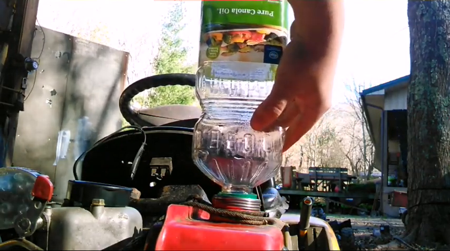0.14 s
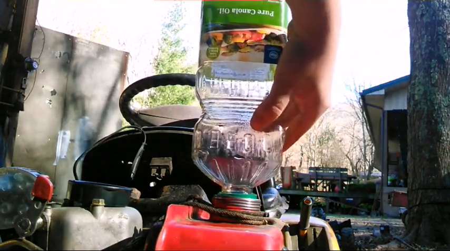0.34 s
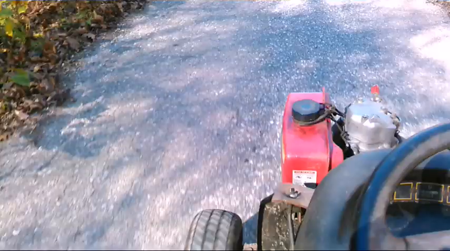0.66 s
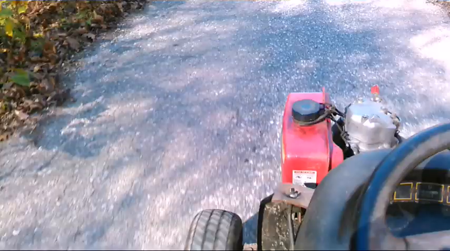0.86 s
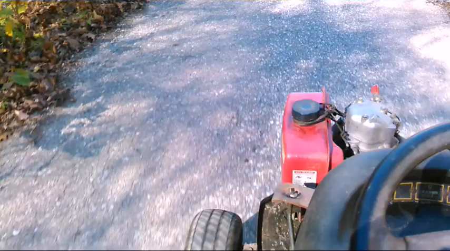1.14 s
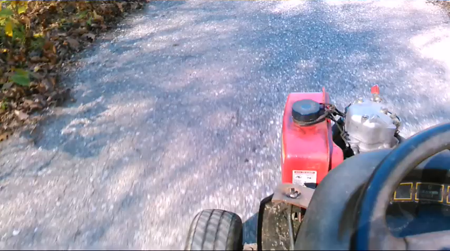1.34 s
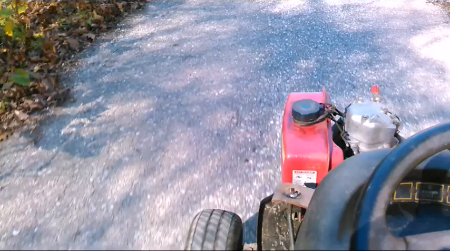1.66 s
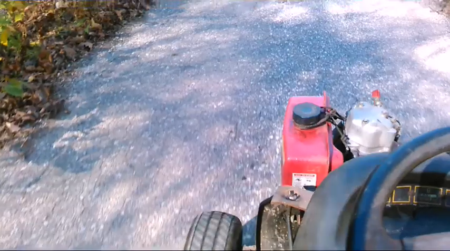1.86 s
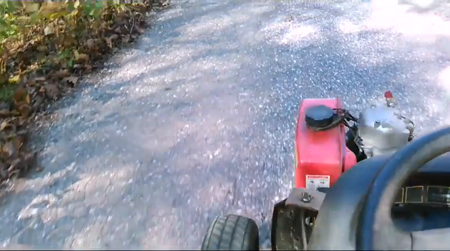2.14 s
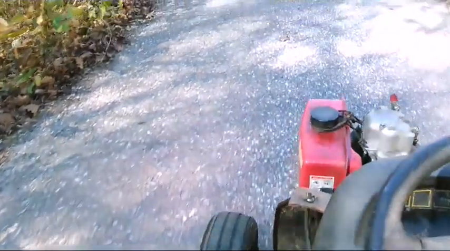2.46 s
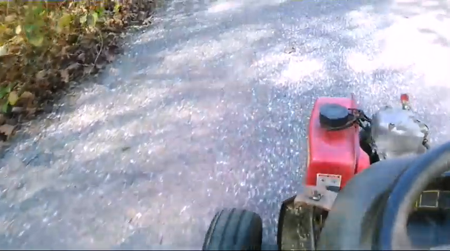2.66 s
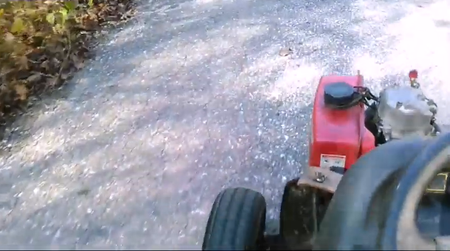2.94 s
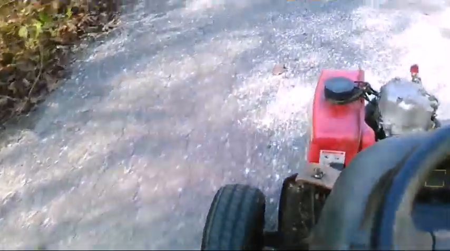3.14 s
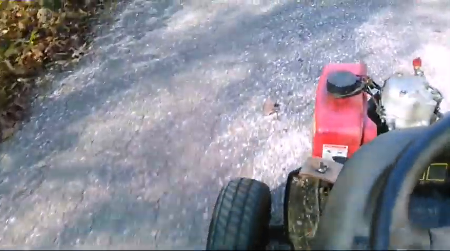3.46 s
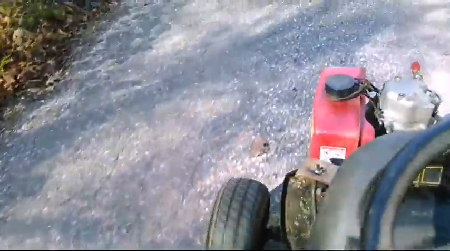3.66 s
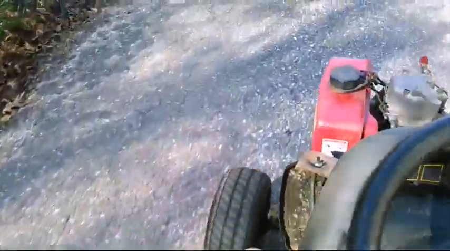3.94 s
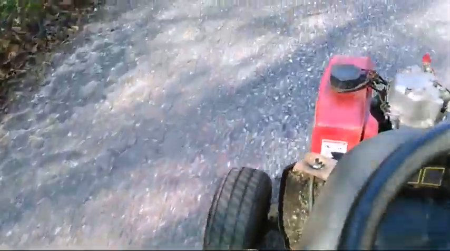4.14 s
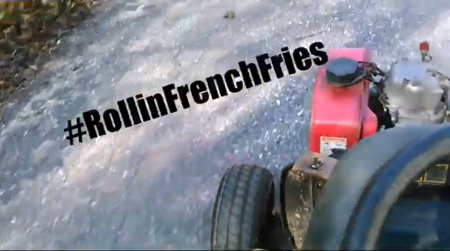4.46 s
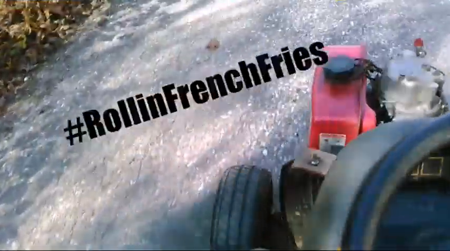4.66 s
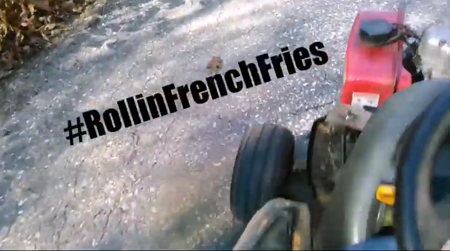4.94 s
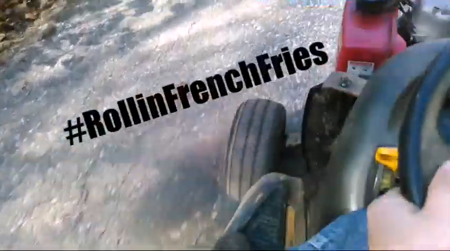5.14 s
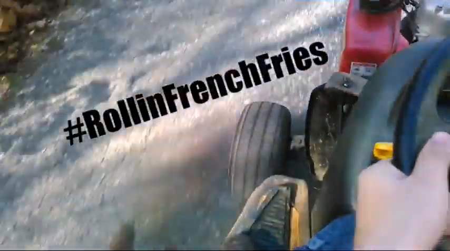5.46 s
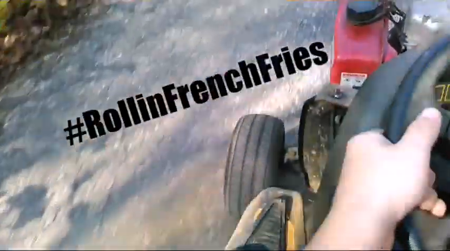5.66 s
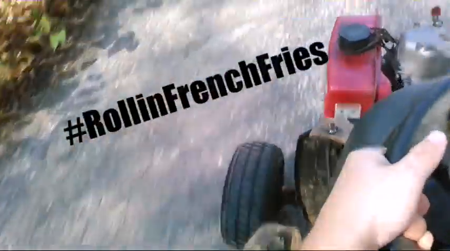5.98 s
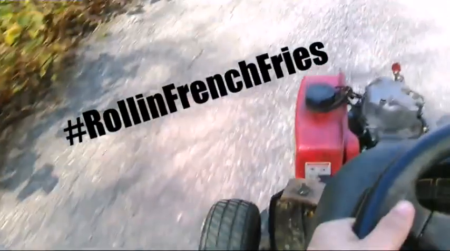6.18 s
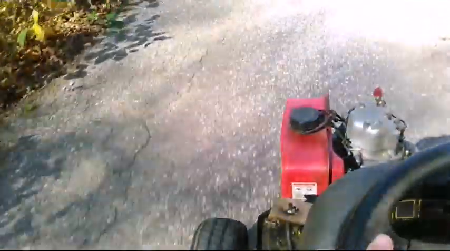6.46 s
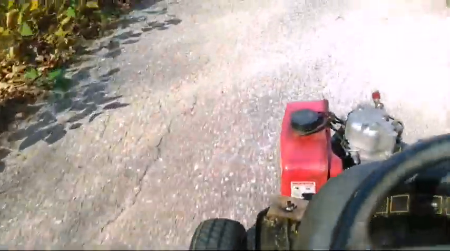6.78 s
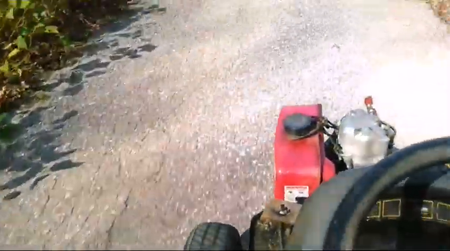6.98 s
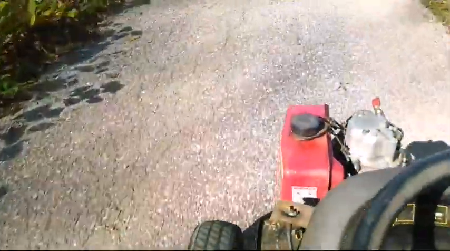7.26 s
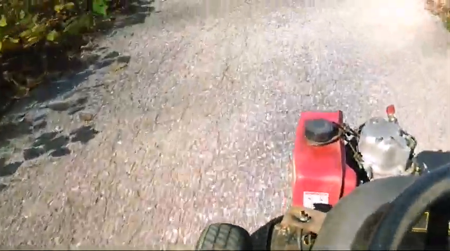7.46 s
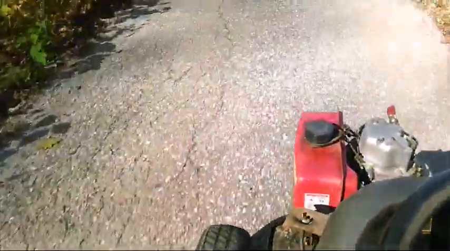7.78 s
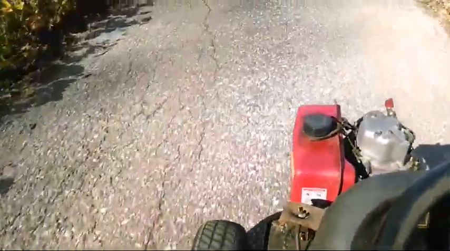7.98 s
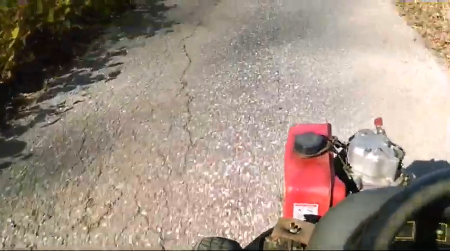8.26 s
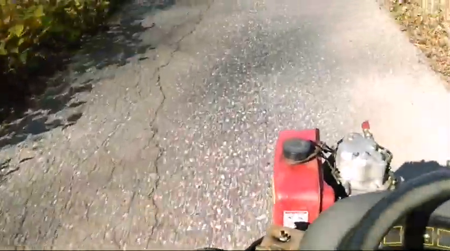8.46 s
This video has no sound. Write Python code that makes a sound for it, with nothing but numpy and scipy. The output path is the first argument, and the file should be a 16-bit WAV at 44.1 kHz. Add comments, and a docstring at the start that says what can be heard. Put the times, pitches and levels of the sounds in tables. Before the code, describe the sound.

A small one-cylinder diesel on a garden tractor is heard up close outdoors, entering abruptly after a short soft thump, a faint rustle of a plastic bottle and a brief silence. It idles with thudding exhaust and chattering loose metal covers, eases slightly, then revs up with hard knocking. The engine levels off at high speed and keeps running evenly with a bright metallic clatter.

```python
"""First a short low thump, a faint low hum and the rustle of a plastic bottle in a quiet yard; then a
moment of silence; then a ride on a garden tractor. Its one-cylinder diesel idles, knocks hard as it is
throttled up, and settles at the speed its governor (a speed regulator) holds.
Puffs of gas make the drone, burning fuel shakes the engine block, and loose tin clatters in every
cycle (the time from one firing to the next). A limiter holds down the loudest peaks."""
import sys
import numpy as np
from scipy import signal
from scipy.fft import rfft, irfft
from scipy.io import wavfile
from scipy.ndimage import uniform_filter1d, minimum_filter1d

SR = 44100
rng = np.random.default_rng(int(sys.argv[2]) if len(sys.argv) > 2 else 0)


def wrap_up_sound(samples):
    """Save the sound to the file named by the first command line argument, as 16-bit audio."""
    columns = np.atleast_2d(samples).T
    # keep every value between -1 and 1, then stretch to whole-number steps
    tamed = np.clip(columns, -1, 1)
    steps = np.round(tamed * 32767).astype(np.int16)
    wavfile.write(sys.argv[1], SR, steps)


N = 380141
TIME = np.arange(N) / SR

# A short low thump, then faint crinkles: (time [s], level [dB], pitch [Hz], width [Hz], decay [s])
THUMP_AND_CRINKLES = [(.003, -31, 135, 40, 0.0096), (.487, -71, 900, 1200, .05),
                      (.636, -59.5, 1500, 2500, 0.11), (.64, -61, 5200, 1200, 0.047)]
# Tone colours of the yard's hum and air: (frequency [Hz], level [dB])
HUM_COLOUR = [(25, -20), (45, -16), (60, 3), (75, -2), (100, -17), (200, -20), (400, -52)]
AIR_COLOUR = [(100, -39), (170, -14), (254, 3), (454, -4), (799, -5), (2200, -22), (3350, -32), (3870, -38),
              (4780, -29), (8000, -51), (10400, -79), (17600, -120)]
# Swells of the hum: (start [s], length [s], level [dB])
YARD_SWELLS = [(.014, 0.054, -49.5), (0.3, 0.14, -57), (.68, 0.078, -55)]
# Soft rustles: (time [s], level [dB], decay [s])
SOFT_RUSTLES = [(.098, -64, 0.074), (.305, -68, .08), (.487, -53.5, 0.5)]

# Tones of the drone at idle, lugging (straining at low speed), revving up and at full speed:
# (pitch [multiple of the firing rate], level [dB])
IDLE_TONES = [(1, -49), (2, -38), (3, -29), (4, -24), (5, -27), (6, -21), (7, -23), (8, -32), (9, -25),
              (10, -22), (11, -20), (12, -22), (13, -29), (14, -28), (15, -25), (16, -32), (17, -31),
              (18, -25), (19, -32), (20, -40), (21, -35), (22, -34), (24, -44), (26, -31), (28, -38),
              (30, -31), (32, -36), (34, -42), (36, -41), (38, -48), (40, -47)]
LUG_TONES = [(1, -46), (2, -33), (3, -31), (4, -25), (5, -24), (6, -21), (7, -21), (8, -28), (9, -35),
             (10, -33), (11, -28), (12, -27), (13, -30), (14, -23), (15, -36), (16, -26), (17, -29),
             (18, -24), (19, -30), (20, -30), (21, -37), (22, -35), (24, -35), (26, -43), (28, -44),
             (30, -37), (32, -46), (34, -43), (36, -38), (38, -34), (40, -34)]
REV_TONES = [(1, -39), (2, -25), (3, -22), (4, -29), (5, -26), (6, -21), (7, -19), (8, -21), (9, -27),
             (10, -22), (11, -27), (12, -19), (13, -21), (14, -19), (15, -24), (16, -25), (17, -28),
             (18, -27), (19, -26), (20, -32), (21, -31), (22, -34), (24, -38), (26, -37), (28, -37),
             (30, -32), (32, -33), (34, -34), (36, -37), (38, -35), (40, -34)]
FAST_TONES = [(1, -34), (2, -19), (3, -20), (4, -32), (5, -26), (6, -21), (7, -17), (8, -24), (9, -22),
              (10, -19), (11, -28), (12, -24), (13, -23), (14, -20), (15, -22), (16, -25), (17, -31),
              (18, -30), (19, -33), (20, -40), (21, -42), (22, -41), (24, -36), (26, -45), (28, -36),
              (30, -42), (32, -41), (34, -40), (36, -45), (38, -44), (40, -43)]
# Exhaust, intake and compression puffs in the same four states:
# (place in cycle [0-1], pipe pitch [Hz], sharpness of the ring [Q], weight [dB])
IDLE_GAS_PUFFS = [(.04, 420, 6, -21), (.32, 150, 2.2, 0.5), (.56, 215, 2.2, -4), (.84, 235, 2.5, -14.5)]
LUG_GAS_PUFFS = [(.32, 240, 2.2, -1), (.55, 200, 2.2, 0), (.83, 220, 2, -9)]
REV_GAS_PUFFS = [(0.324, 326, 5.7, -4), (0.535, 221, 2.8, 2), (.8, 200, 1.8, -3)]
FAST_GAS_PUFFS = [(0.316, 437, 5.5, 0), (0.512, 219.4, 3.3, 4), (.77, 165, 1.4, 0.5)]
# Tone colour of gas swirling in the pipes: (frequency [Hz], level [dB])
SWIRL_COLOUR = [(25, -22), (60, -5), (120, -1), (250, -1.5), (430, 0), (600, -16), (1200, -13)]
# Rushes of gas through the valves: (place in cycle [0-1], rise [cycles], fall [cycles], level [dB])
IDLE_RUSHES = [(.26, .04, .08, 0), (.575, .02, .04, -2)]
FAST_RUSHES = [(.34, .05, .06, 0), (.5, .03, .1, -1)]
# Notes those rushes ring in the pipes: (pitch [Hz], width [Hz], level [dB])
PIPE_NOTES = [(416, 100, 0), (610, 200, -4.5), (746, 93, 3), (813, 100, -5)]

# Hits on the block, the tin covers and a loose panel, and those of the hard knock:
# (place in cycle [0-1], rise [cycles], fall [cycles], level [dB])
BLOCK_HITS = [(.11, .09, .22, 0), (.27, .05, .08, -4), (.58, .03, .06, -4), (.92, .04, .15, -8)]
IDLE_TIN_HITS = [(.06, .012, .02, -2), (.39, .06, .1, -14), (.585, .012, .025, -8), (.73, .04, .09, -3),
                 (.895, .008, .025, -7)]
FAST_TIN_HITS = [(.04, .015, .05, -4), (.16, .06, .08, -5), (.35, .015, .07, 1), (.5, .03, .08, -2),
                 (.72, .04, .07, 0)]
PANEL_HITS = [(.07, .06, .14, -3), (.2, .06, .2, -5)]
KNOCK_HITS = [(.11, .06, .05, 0), (.2, .02, .06, -5)]
# Tone colours of the block, the tin and the fine sizzle: (frequency [Hz], level [dB])
BLOCK_COLOUR = [(150, 5), (300, 1), (430, 5.5), (580, -2.5), (740, -0.5), (900, -2), (1120, -0.5),
                (1450, -11), (2000, -12), (2450, -17.5), (3000, -12.5), (6000, -11.5), (8000, -64)]
IDLE_TIN_COLOUR = [(1500, -10.5), (2900, -16), (3600, -6.5), (4300, -2), (4700, 2), (5200, 6), (5700, 0.5),
                   (6400, -2.5), (7000, -8.5), (7500, -33), (7900, -116)]
FAST_TIN_COLOUR = [(1500, -19.5), (2900, -22), (3700, -18.5), (4350, -8.5), (4900, -6), (5500, -3),
                   (5850, -2), (6400, -6.5), (7000, -16.5), (7600, -21.5), (8400, -99.5)]
SIZZLE_COLOUR = [(6000, -45), (8200, -10.5), (9800, 1), (11000, -5.5), (11900, 2.5), (12700, -6.5),
                 (13300, -11), (14500, -12), (15600, -42)]
# Notes of the clinking covers: (pitch [Hz], width [Hz], idle level [dB], full-speed level [dB])
COVER_NOTES = [(2437, 48, -8, -12), (3514, 39, -12, -13), (4177, 84, -5.5, -12), (4380, 52, -10, -3.5),
               (5380, 56, -12, 1), (5453, 86, 1, 4.5), (5580, 34, 2.5, -1.5), (5910, 46, -2.5, 3),
               (6420, 54, -6, -11)]
# Pings of valve gear and covers: (place in cycle [0-1], rise [cycles], fall [cycles], pitch [Hz],
# idle level [dB], revving level [dB], full-speed level [dB])
METAL_PINGS = [(.025, .015, .05, 6050, -21, -20, -11), (.365, .012, .055, 5700, -32, -6, -12),
               (.575, .01, .025, 6450, -9, -24, -22), (.71, .03, .07, 5520, -11, -6, -3),
               (.765, .025, .045, 5680, -10, -8, -3.5), (.73, .025, .07, 4200, -14, -16, -15),
               (.74, .03, .08, 2430, -23, -25, -25), (.885, .008, .028, 5800, -8.5, -19, -22)]
# Brief, faint, bright crackles of overload distortion at idle: (time [s], level added to CRACKLE_DB [dB])
OVERLOAD_CRACKLES = [(1.1623, -36), (1.2436, -32), (1.6297, -31), (1.8876, -34), (1.9604, -40),
                     (2.1435, -32), (2.2722, -32), (2.4653, -35), (2.9158, -31)]
# Notes of the block under hard knock: (pitch [Hz], width [Hz], level [dB])
KNOCK_NOTES = [(715, 80, 2), (900, 90, 1), (1040, 70, 10), (1150, 80, 9), (1240, 80, 1), (1480, 90, -1),
               (1610, 70, -2), (1720, 60, -2), (1860, 70, -5)]
# Brief dips in the tin's chatter: (middle [s], half length [s], depth [dB])
CHATTER_DIPS = [(4.15, 0.44, -3), (4.75, 0.16, -2), (8.174, 0.36, -3)]

YARD_OFF_S, ENGINE_ON_S = .758, 1.144
HUM_FLOOR_DB, HUM_EDGE_S, AIR_DB = -60, .025, -64.5
IDLE_RATE, LUG_RATE, REV_RATE, GOVERNED_RATE = 15.557, 18.2, 22.9, 27.8213  # firings per second
# The fuel is eased off, the throttle opens, then the governor catches the speed.
EASE_S, OPEN_S, CATCH_S = 2.72, 3.2403, 4.57
EASE_TAKES_S, OPEN_TAKES_S, CATCH_TAKES_S = .31, .029, .13
CLIMB_PER_S, DRAG_S, SETTLE_S = 12.4554, 2.3136, .1499  # the climb starts at this gain in rate per s
IDLE_FUEL, CRUISE_FUEL = .7, .66  # fuel per stroke: 0 is least, 1 is full
OPENING_SHARE = .36  # share of the effort that comes at once with the throttle; the rest needs speed
# Loudness rules: (idle level [dB], gain from least to full fuel [dB], gain from idle to full speed [dB])
DRONE_LAW, SWIRL_LAW = (1.2, .5, .8), (-31, 0, 12.5)
BLOCK_LAW, TIN_LAW, KNOCK_LAW = (-17.3, 7, .5), (-14.5, 6.6, 2.1), (-29, 52, -4)
RASP_IDLE_DB, RASP_FAST_DB = -24.5, -20
PANEL_IDLE_DB, PANEL_QUIET_DB, PANEL_FAST_DB = 1.5, -35, -24.5  # relative to the tin's hits
SIZZLE_IDLE_DB, SIZZLE_OPEN_DB, SIZZLE_WAKES_S = -56.5, -29.5, .18
SIZZLE_FLICKER_DB, SIZZLE_DIP_RATIO = 2.86, 2.85  # at full speed it dips this many times as many dB
CRACKLE_DB, CRACKLE_DECAY_S = -7, .005
IGNITION_PLACE, IGNITION_DB = .105, 2  # place in the cycle; level relative to the knock's rattle
CEILING_DB, CUTOFF_HZ = -.5, 16200


def from_db(db):
    """Turn decibels into a factor to multiply by."""
    return 10 ** (np.asarray(db) / 20)


def rms_one(x):
    """Scale a signal to an average (rms) level of 1."""
    return x / np.sqrt(np.mean(x ** 2) + 1e-20)


def ramp(start_s, takes_s):
    """Rise from 0 to 1 in a straight line."""
    return np.clip((TIME - start_s) / takes_s, 0, 1)


def dying(start_s, decay_s):
    """Start suddenly, then fade away."""
    return (TIME > start_s) * np.exp(-np.clip((TIME - start_s) / decay_s, 0, 20))


def drift(per_s):
    """Wander at random, by about 1 either way, through per_s points a second."""
    points = rng.standard_normal(N // 8)
    return np.interp(TIME * per_s, np.arange(len(points)), points)


def coloured(x, colour):
    """Give x a tone colour that falls 20 dB per octave past the table's ends; level 1."""
    hz, level_db = np.transpose(colour)
    octave, known = np.log2(np.arange(N // 2 + 1) * SR / N + 1), np.log2(hz)
    beyond = np.abs(octave - np.clip(octave, known[0], known[-1]))
    gain = from_db(np.interp(octave, known, level_db) - 20 * beyond)
    return rms_one(irfft(rfft(x) * gain, N))


def resonate(x, hz, width_hz):
    """Let x ring at one pitch, longer if the width is narrow; level 1."""
    r = np.exp(-np.pi * width_hz / SR)
    return rms_one(signal.lfilter([1, 0, -1], [1, -2 * r * np.cos(2 * np.pi * hz / SR), r * r], x))


def ring_notes(x, notes):
    """Let x ring several notes at once, every second one flipped in sign; level 1."""
    return rms_one(sum((-1) ** k * from_db(db) * resonate(x, hz, width)
                       for k, (hz, width, db) in enumerate(notes)))


def bursts(cycle, table, scatter_db, slip):
    """Power of bursts in every cycle, straying in strength and, by about slip cycles, in timing."""
    power = np.zeros(N)
    for place, rise, fall, level_db in table:
        chance = rng.standard_normal((256, 2))
        since = cycle - place + 1 / 4  # a quarter cycle early, to leave room for the rise
        which = np.floor(since).astype(int) + 1
        age = since % 1 - 1 / 4 - slip * chance[which, 1]
        shape = np.exp(np.where(age < 0, -(age / rise) ** 2, -2 * age / fall))
        power += shape * (from_db(level_db + scatter_db * chance[:, 0]) ** 2)[which]
    return power


def envelope(power):
    """Turn burst power into a loudness curve whose slow level stays at 1."""
    return np.sqrt(power / (uniform_filter1d(power, size=SR // 3) + 1e-9) + 1e-9)


def impacts(cycle, repeat):
    """Noise of countless tiny impacts; the share `repeat` comes back alike in every cycle."""
    index = np.arange(N)
    new_cycle = np.diff(np.floor(cycle), prepend=0) > 0
    start = np.maximum.accumulate(index * new_cycle)
    fresh, alike = rng.standard_normal((2, N))
    return np.sqrt(1 - repeat) * fresh + np.sqrt(repeat) * alike[index - start]


def part_db(law, fuel, speed):
    """The level of an engine part follows fuel and speed."""
    idle_db, fuel_db, speed_db = law
    return idle_db + fuel_db * (fuel - IDLE_FUEL) + speed_db * speed


def thump_and_crinkles():
    """A short low thump as the sound begins, then faint crinkles of a plastic bottle being handled."""
    return sum(from_db(db) * dying(s, decay) * resonate(rng.standard_normal(N), hz, width)
               for s, db, hz, width, decay in THUMP_AND_CRINKLES)


def yard():
    """A low hum that swells, and outdoor air with soft rustles."""
    swells = sum(from_db(db) * (ramp(s, HUM_EDGE_S) - ramp(s + length, HUM_EDGE_S))
                 for s, length, db in YARD_SWELLS)
    rustles = sum(from_db(db) * dying(s, decay) for s, db, decay in SOFT_RUSTLES)
    hum = (from_db(HUM_FLOOR_DB) + swells) * coloured(rng.standard_normal(N), HUM_COLOUR)
    air = (from_db(AIR_DB) + rustles) * coloured(rng.standard_normal(N), AIR_COLOUR)
    return hum + air


def crank_rate():
    """Firings per second: idle, a climb that drag flattens, a small overshoot the governor settles."""
    climbing_s = np.clip(TIME, OPEN_S, CATCH_S) - OPEN_S
    free = IDLE_RATE + CLIMB_PER_S * DRAG_S * (1 - np.exp(-climbing_s / DRAG_S))
    return GOVERNED_RATE + (free - GOVERNED_RATE) * np.exp(-np.maximum(TIME - CATCH_S, 0) / SETTLE_S)


def drone(cycle, firings):
    """Tones at multiples of the firing rate, bunched into thumps by puffs that ring the pipes."""
    rates = [IDLE_RATE, LUG_RATE, REV_RATE, GOVERNED_RATE]
    states = [(IDLE_TONES, IDLE_GAS_PUFFS), (LUG_TONES, LUG_GAS_PUFFS),
              (REV_TONES, REV_GAS_PUFFS), (FAST_TONES, FAST_GAS_PUFFS)]
    multiples = np.array(IDLE_TONES)[:, 0]
    gains, phases = [], []
    for rate, (tones, puffs) in zip(rates, states):
        pipes = 0
        for place, hz, q, db in puffs:
            ratio = multiples * rate / hz
            puff = from_db(db) * np.exp(-2j * np.pi * multiples * place)
            pipes += puff / (1 - ratio ** 2 + 1j * ratio / q)
        gains.append(np.sqrt(2) * from_db(np.array(tones)[:, 1]))
        phases.append(np.angle(pipes))  # the puffs set only the timing of each tone
    out = np.zeros(N)
    for k, gain, phase in zip(multiples, np.transpose(gains), np.transpose(phases)):
        shift = np.interp(firings, rates, np.unwrap(phase))  # glide between the four states
        out += np.interp(firings, rates, gain) * np.cos(2 * np.pi * k * cycle + shift)
    return out


def gas(cycle, firings, fuel, speed):
    """The drone, no two firings quite alike, plus swirling in the pipes that grows with the flow."""
    uneven_cycle = cycle + .0018 * drift(per_s=40)
    tone = drone(uneven_cycle, firings)
    swirl = from_db(part_db(SWIRL_LAW, fuel, speed)) * coloured(rng.standard_normal(N), SWIRL_COLOUR)
    return tone * from_db(part_db(DRONE_LAW, fuel, speed) + .5 * drift(per_s=51)) + swirl


def rasp(cycle, effort):
    """Gas rushes through the valves twice a cycle and rings the pipes, nearly alike each time."""
    load = np.minimum(1, 3 * effort)
    idle = bursts(cycle, IDLE_RUSHES, scatter_db=0, slip=.0023)
    fast = bursts(cycle, FAST_RUSHES, scatter_db=0, slip=.0027)
    rush = impacts(cycle, repeat=.62) * envelope((1 - load) * idle + load * fast)
    rush = signal.sosfilt(signal.butter(2, 5000, "low", fs=SR, output="sos"), rush)
    return from_db(RASP_IDLE_DB + (RASP_FAST_DB - RASP_IDLE_DB) * effort) * ring_notes(rush, PIPE_NOTES)


def block(cycle):
    """Burning fuel and the valve gear shake the engine block."""
    power = bursts(cycle, BLOCK_HITS, scatter_db=1.5, slip=.003) + .3
    return coloured(impacts(cycle, repeat=.3) * envelope(power), BLOCK_COLOUR)


def clinks(power, effort):
    """About 1500 metal contacts a second, crowded at the hits; each rings the covers its own way."""
    contacts = rng.random(N) < 1500 * envelope(power) ** 2 / SR
    out = np.zeros(N)
    for hz, width_hz, idle_db, fast_db in COVER_NOTES:
        note = resonate(contacts * rng.standard_normal(N), hz, width_hz)
        out += from_db(idle_db + effort * (fast_db - idle_db)) * note
    return rms_one(out)


def tin(cycle, effort, panel_db):
    """Covers and brackets chatter at set places in the cycle; gives their ring and the sizzle above it."""
    idle = bursts(cycle, IDLE_TIN_HITS, scatter_db=.85, slip=.0036) + .04
    fast = bursts(cycle, FAST_TIN_HITS, scatter_db=3.5, slip=.0036) + .18
    load = np.minimum(1, 3 * effort)
    power = (1 - load) * idle + load * fast
    buzz = from_db(panel_db) ** 2 * bursts(cycle, PANEL_HITS, scatter_db=2, slip=.0079)
    chatter = envelope((power + buzz) * from_db(2 * drift(per_s=690)) ** 2)
    strikes = impacts(cycle, repeat=.19) * chatter
    rattle = (1 - load) * coloured(strikes, IDLE_TIN_COLOUR) + load * coloured(strikes, FAST_TIN_COLOUR)
    ring = from_db(-1.5) * rattle + from_db(-4) * clinks(power ** 1.5, effort)
    dull = signal.sosfilt(signal.cheby2(10, 40, 8200, fs=SR, output="sos"), ring)  # less treble at idle
    sizzle = coloured(rng.standard_normal(N) * chatter ** .77, SIZZLE_COLOUR)
    return (1 - load) * dull + load * ring, sizzle


def pings(cycle, effort):
    """Valve gear and covers ring brightly, each once a cycle at its own wavering pitch."""
    out = np.zeros(N)
    for place, rise, fall, hz, idle_db, rev_db, fast_db in METAL_PINGS:
        power = bursts(cycle, [(place, rise, fall, 0)], scatter_db=2, slip=.004)
        level_db = np.interp(effort, [0, .35, .65, 1], [idle_db, rev_db, rev_db, fast_db])
        pitch_hz = hz + 100 * drift(per_s=500)
        out += from_db(level_db) * np.sqrt(power) * np.sin(2 * np.pi * np.cumsum(pitch_hz) / SR)
    return out


def overload_crackles():
    """Faint, bright crackles of overload distortion at idle, made as brief noise bursts at set times."""
    loudness = sum(from_db(db + CRACKLE_DB) * dying(s, CRACKLE_DECAY_S) for s, db in OVERLOAD_CRACKLES)
    return loudness * coloured(rng.standard_normal(N), SIZZLE_COLOUR)


def hard_knock(cycle):
    """Extra fuel catches fire all at once, and the jump in pressure rings the cylinder."""
    ignitions = np.floor(cycle - IGNITION_PLACE)
    jump = rms_one(np.diff(ignitions, prepend=ignitions[0]))
    rattle = impacts(cycle, repeat=.05) * envelope(bursts(cycle, KNOCK_HITS, scatter_db=1, slip=.0024))
    return ring_notes(rattle + from_db(IGNITION_DB) * jump, KNOCK_NOTES)


def engine():
    """All parts follow one crank and its fuel; a faint, slightly late copy of the clatter differs between the
    ears."""
    firings = crank_rate()
    cycle = np.cumsum(firings) / SR
    cycle += .0252 - cycle[np.argmax(TIME > ENGINE_ON_S)] % 1  # the ride begins early in a cycle
    speed = (firings - IDLE_RATE) / (GOVERNED_RATE - IDLE_RATE)  # 0 at idle, 1 at full speed
    eased, opened = ramp(EASE_S, EASE_TAKES_S), ramp(OPEN_S, OPEN_TAKES_S)
    caught = ramp(CATCH_S - CATCH_TAKES_S / 2, CATCH_TAKES_S)
    fuel = IDLE_FUEL * (1 - eased) + opened - (1 - CRUISE_FUEL) * caught
    effort = np.clip(OPENING_SHARE * opened + (1 - OPENING_SHARE) * speed, 0, 1)
    dip_db = sum(db * np.exp(-((TIME - s) / half_s) ** 2) for s, half_s, db in CHATTER_DIPS)
    # The loose panel buzzes at idle, goes quiet as the fuel is eased and partly returns with speed.
    panel_db = PANEL_IDLE_DB + (PANEL_QUIET_DB - PANEL_IDLE_DB) * eased
    panel_db += (PANEL_FAST_DB - PANEL_QUIET_DB) * speed
    ring, sizzle = tin(cycle, effort, panel_db)
    pipes = gas(cycle, firings, fuel, speed) + rasp(cycle, effort)
    clatter = from_db(part_db(BLOCK_LAW, fuel, speed)) * block(cycle)
    clatter += from_db(part_db(KNOCK_LAW, fuel, speed)) * hard_knock(cycle)
    clatter += from_db(part_db(TIN_LAW, fuel, speed) + dip_db) * ring
    clatter += from_db(dip_db / 2) * pings(cycle, effort) + overload_crackles()
    sizzle_db = SIZZLE_IDLE_DB + (SIZZLE_OPEN_DB - SIZZLE_IDLE_DB) * ramp(OPEN_S, SIZZLE_WAKES_S)
    sizzle_db += SIZZLE_DIP_RATIO * caught * dip_db + SIZZLE_FLICKER_DB * drift(per_s=14)
    clatter += from_db(sizzle_db) * sizzle
    late_copy = np.interp(TIME - .004, TIME, from_db(-44) * clatter)
    return ramp(ENGINE_ON_S, .0014) * (pipes + clatter + late_copy * [[1], [-1]])


def scene():
    """The quiet yard, a moment of silence, then the ride."""
    return (yard() + thump_and_crinkles()) * (TIME < YARD_OFF_S) + engine()


def record(dry):
    """A fast limiter turns down the loudest peaks; the deepest bass and highest treble are cut."""
    peak = np.abs(dry).max(axis=0)
    allowed_gain = np.minimum(1, from_db(CEILING_DB) / (peak + 1e-9))
    gain = minimum_filter1d(allowed_gain, size=41)
    gain = uniform_filter1d(uniform_filter1d(gain, size=21), size=21)
    held = signal.sosfilt(signal.butter(1, 3, "high", fs=SR, output="sos"), dry * gain)
    return signal.sosfiltfilt(signal.cheby2(8, 40, CUTOFF_HZ, fs=SR, output="sos"), held)


dry = scene()
out = record(dry)
wrap_up_sound(out)
```